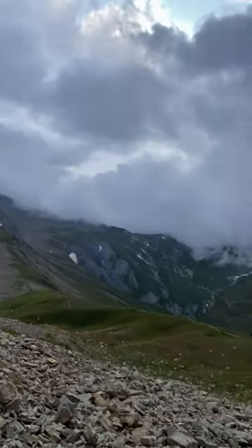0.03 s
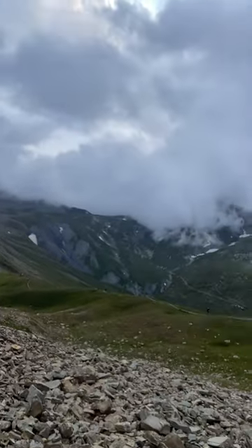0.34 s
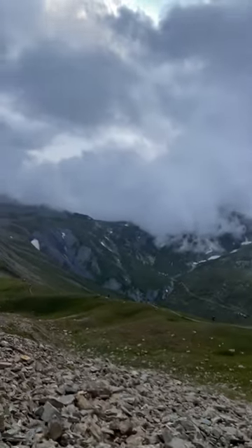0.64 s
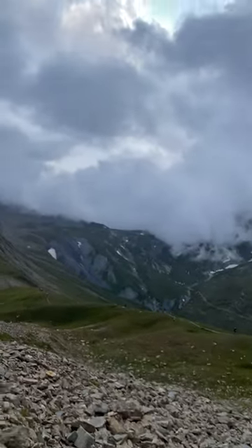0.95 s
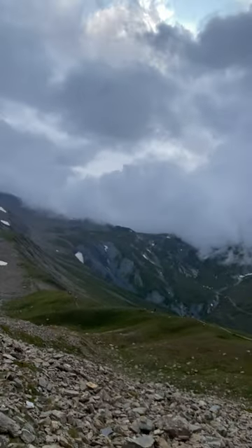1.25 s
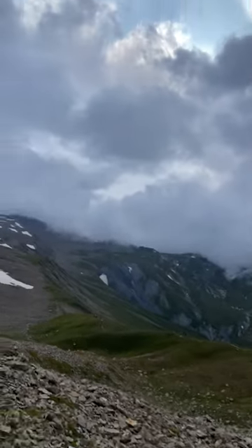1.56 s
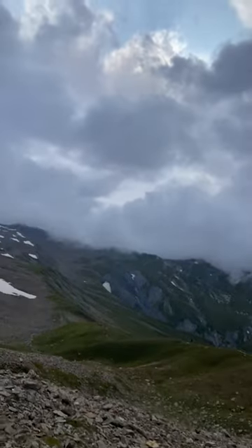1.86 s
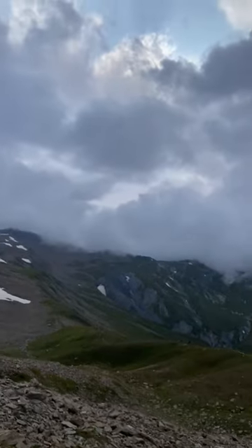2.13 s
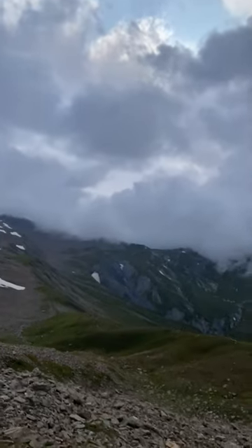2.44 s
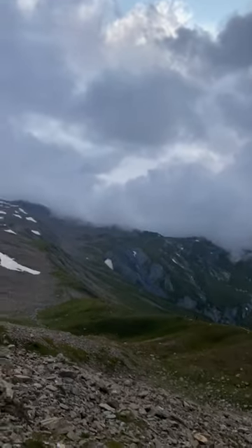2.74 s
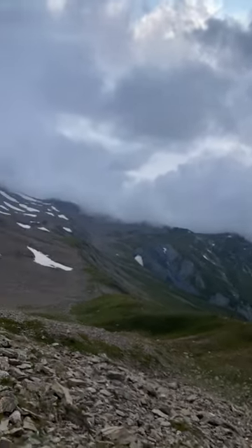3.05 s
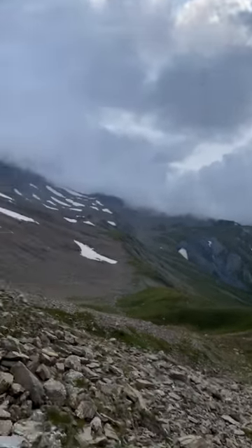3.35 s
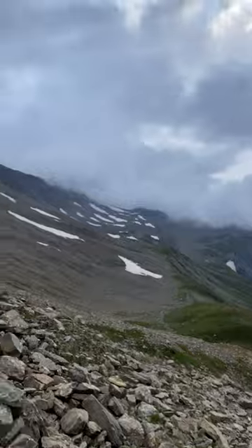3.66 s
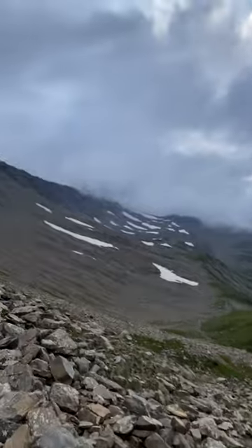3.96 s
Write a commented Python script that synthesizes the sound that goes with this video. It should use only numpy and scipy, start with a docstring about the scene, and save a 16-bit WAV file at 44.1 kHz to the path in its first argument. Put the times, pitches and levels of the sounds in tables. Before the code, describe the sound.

Close footsteps grind gravel and knock stones together on an open slope, with small gear ticks and brief jacket swishes. A gust buffets the microphone, then dies down as the steps go on with sharper clacks and dull thuds.

```python
"""A walker's boots crunch over loose stones on a windy mountainside, camera in hand.
Each press grinds the gravel or tips a flat stone with a clack, and heavy steps jolt the camera.
Close by, a jacket swishes as its cloth rubs, and small hard pieces of gear tick together.
Behind it all, a gust rumbles on the microphone, whistles thinly over an edge and dies down."""
import sys
import numpy as np
from scipy import signal
from scipy.fft import rfft, irfft, next_fast_len
from scipy.io import wavfile
from scipy.ndimage import map_coordinates

SR = 44100
rng = np.random.default_rng(int(sys.argv[2]) if len(sys.argv) > 2 else 0)


def transcribe(signal):
    """Save signal, clipped to [-1, 1], as a 16-bit WAV file at the path in sys.argv[1]."""
    frames = np.atleast_2d(signal).T
    limited = np.clip(frames, -1, 1)
    pcm = np.round(limited * 32767).astype(np.int16)
    wavfile.write(sys.argv[1], SR, pcm)


N = 4 * SR

# how the wind's upper rumble and its rush swell and fade: time_s, relative_level_db
SWIRL_LEVELS = [(0, -42), (.1, -30.5), (.3, -40), (.42, -30), (.65, -23.5), (.82, -36.5), (1.1, -33.5),
                (1.35, -37.5), (1.7, -36.5), (2.3, -44.5), (4, -52)]
RUSH_LEVELS = [(0.0, -43.5), (0.19, -52.5), (0.4, -43.5), (0.57, -41), (0.92, -43.5), (1.14, -37),
               (1.3, -42.5), (1.63, -40), (1.79, -45), (2.36, -47.5), (2.56, -47.5), (4.0, -51.5)]
# the tone of coarse gravel and of a small hard click: frequency_hz, gain_db
GRAVEL_SPECTRUM = [(150, -22), (400, 0), (800, -4.5), (1300, -2), (2000, 0), (2400, -4.5), (2850, -10.5),
                   (4000, -21), (5500, -37), (12000, -67.5)]
CLICK_SPECTRUM = [(800, -31), (2000, -12.5), (2700, 4), (3800, -4), (5000, -5.5), (6800, 0), (8300, -1.5),
                  (9500, -11.5), (11000, -7), (13000, -15.5), (15000, -29.5)]
SIDES = np.array([[1], [-1]])  # plus for the left channel, minus for the right


def amp(db):
    """Turn decibels into a number to multiply by."""
    return 10 ** (np.asarray(db) / 20)


def unit(x):
    """Scale a sound to an average (rms) level of 1."""
    return x / np.sqrt(np.mean(x ** 2) + 1e-20)


def along(points, hz):
    """Read between (frequency_hz, value) points on a log frequency scale."""
    point_hz, values = np.transpose(points)
    return np.interp(np.log(hz + 1), np.log(point_hz + 1), values)


def curves(rows):
    """One value per sample for each column after the time."""
    times, *columns = np.transpose(rows)
    return [np.interp(np.arange(N) / SR, times, column) for column in columns]


def wobble(per_s):
    """A smooth random curve through per_s new values a second."""
    return map_coordinates(rng.standard_normal(N // 10), [np.arange(N) * per_s / SR], mode="wrap")


def scatter(shape):
    """Bell-curve random numbers, held between -2 and 2."""
    return np.clip(rng.standard_normal(shape), -2, 2)


def filtered(x, response):
    """Multiply each frequency in x by response(hz)."""
    size = next_fast_len(N + SR // 2)
    return irfft(rfft(x, size) * response(np.fft.rfftfreq(size, 1 / SR)), size)[..., :N]


def coloured(x, spectrum, size=2048):
    """Give x a spectrum, with a filter that rings only after each hit."""
    cepstrum = irfft(np.log(amp(along(spectrum, np.fft.rfftfreq(size, 1 / SR)))))
    cepstrum[1:size // 2] *= 2  # move the ringing from before the hit to after it
    cepstrum[size // 2 + 1:] = 0
    return signal.fftconvolve(x, irfft(np.exp(rfft(cepstrum))))[:N]


def noise(spectrum):
    """Steady noise with the given spectrum."""
    return unit(filtered(rng.standard_normal(N), lambda hz: amp(along(spectrum, hz))))


def grains(spectrum, per_s, spread_db, hiss):
    """Tiny hits of random size over a smooth hiss."""
    hits = (rng.random(N) < per_s / SR) * np.sign(rng.standard_normal(N))
    hits *= amp(spread_db * scatter(N))
    return unit(coloured(unit(hits) + hiss * rng.standard_normal(N), spectrum))


def strokes(rows, rise_s=0.003, fall_s=0.007):
    """A loudness curve: each (start_s, length_s, level_db) row rises, holds and dies away."""
    power, t = np.zeros(N), np.arange(N) / SR
    for start_s, length_s, level_db in rows:
        rise = np.clip((t - start_s) / rise_s + 0.5, 0, 1)
        fall = np.exp(-np.clip((t - start_s - length_s) / fall_s, 0, 20))
        power += (amp(level_db) * rise * fall) ** 2
    return np.sqrt(power)


def add(track, start_s, sound):
    """Mix a sound into the track at start_s."""
    part = track[max(round(start_s * SR), 0):][:len(sound)]
    part += sound[:len(part)]


def nearby(x, left_db, echo_db=-9.5, echo_fade_s=0.013):
    """A close sound reaches both sides of the microphone, with faint echoes off ground and walker."""
    # how far the left side's wave is ahead of the right's: frequency_hz, lead_radians
    left_lead = [(200, 0), (500, -.4), (1050, -.1), (1800, -1.55), (3000, -2.4), (3900, -.9), (4900, -1.8),
                 (5600, -.45), (8500, -.75), (10000, -1.5), (13500, -2.6)]
    direct = filtered(x, lambda hz: np.exp(0.5j * SIDES * along(left_lead, hz)))
    t = np.arange(SR // 10) / SR
    tail = rng.standard_normal((2, len(t))) * t * amp(-60 * t / echo_fade_s)
    tail /= np.linalg.norm(tail, axis=1, keepdims=True)
    echoes = signal.fftconvolve(x[None], tail, axes=1)[:, :N]
    return amp(SIDES * left_db) * (direct + amp(echo_db) * echoes)


def wind_rumble(flutter_db=0.5, stereo_db=-31):
    """Big swirls of air push on both sides of the microphone almost together."""
    # the strength of the push: time_s, level_db
    levels = [(0.0, -23), (0.12, -20), (0.14, -28.5), (0.31, -23), (0.33, -29.5), (0.39, -20.5),
              (0.87, -22), (0.99, -24.5), (1.06, -14), (1.12, -21.5), (2.02, -30), (2.06, -22),
              (2.18, -33.5), (2.65, -29.5), (3.15, -35), (3.8, -33), (3.92, -40.5), (4.0, -34)]
    # its deep tone: frequency_hz, gain_db
    spectrum = [(20, -29.5), (32, -10.5), (45, -8.5), (65, -1.5), (110, -5.5), (160, -14.5), (220, -24),
                (320, -47.5), (1500, -100)]
    level_db, = curves(levels)
    pair = noise(spectrum) + SIDES * amp(stereo_db) * noise(spectrum)
    return amp(level_db) * unit(pair * amp(flutter_db * wobble(8.5)))


def wind_swirl(gain_db=-2, flutter_db=2, stereo_db=-17):
    """Middle-sized swirls thicken the rumble while the gust lasts."""
    # a hump in the upper bass: frequency_hz, gain_db
    spectrum = [(80, -37.5), (130, 0), (175, 4), (240, -8), (330, -21), (600, -67), (2000, -120)]
    level_db, = curves(SWIRL_LEVELS)
    pair = noise(spectrum) + SIDES * amp(stereo_db) * noise(spectrum)
    return amp(level_db + gain_db + flutter_db * wobble(24.97)) * pair


def wind_rush(gain_db=3, flutter_db=1.5):
    """Small swirls make a rushing noise, different on each side of the microphone."""
    # the tone of the rush: frequency_hz, gain_db
    spectrum = [(80, -15), (200, 2), (330, 4), (520, 1), (780, -9), (1200, -15), (1800, -21), (2600, -50.5),
                (3800, -36.5), (5200, -49.5), (7000, -53), (11500, -65.5), (13800, -88.5)]
    # how alike left and right are: frequency_hz, likeness (1 the same, -1 or less opposite)
    likeness = [(200, 0.67), (500, 0.37), (900, -0.45), (1600, -0.25), (2800, -1.2), (7000, 0),
                (13000, -0.9)]

    def shares(hz):
        angle = np.arccos(np.clip(along(likeness, hz), -1, 1)) / 2
        return np.array([np.cos(angle), np.sin(angle)])

    level_db, = curves(RUSH_LEVELS)
    middle, side = filtered(np.array([noise(spectrum), noise(spectrum)]), shares)
    return amp(level_db + gain_db + flutter_db * wobble(35)) * (middle + SIDES * side)


def wind_whistle(waver_hz=26, waver_db=2, breathiness=0.3):
    """Air blowing over an edge makes a thin, unsteady tone that climbs with the wind's speed."""
    # the path the whistle's tones follow: time_s, base_pitch_hz, level_db
    path = [(.2, 1395, -100), (.38, 1450, -53.5), (.48, 1392, -59), (.76, 1423, -58), (1.05, 1602, -58),
            (1.28, 1670, -57.5), (1.35, 1547, -58), (1.61, 1700, -56.5), (1.71, 1424, -58),
            (1.97, 1317, -62.5), (2.5, 1274, -100)]
    base_hz, level_db = curves(path)
    phase = 2 * np.pi * np.cumsum(base_hz + waver_hz * wobble(90)) / SR

    def tone(pitch_ratio, steady=0):
        strength = steady + breathiness * (wobble(130) + 1j * wobble(130))
        return np.real(strength * np.exp(1j * pitch_ratio * phase))

    middle = unit(tone(0.98, steady=1)) + amp(-26) * unit(tone(2.2))
    side = tone(0.93)
    return amp(level_db + waver_db * wobble(30)) * unit(middle + SIDES * side)


def wind_whine(pitch_hz=12060, width_hz=170, gain_db=-52.5, flicker_db=3):
    """A very faint high whine rises and falls with the gust."""
    gust_db = (curves(SWIRL_LEVELS)[0] + curves(RUSH_LEVELS)[0]) / 2
    band = filtered(rng.standard_normal(N), lambda hz: np.exp(-((hz - pitch_hz) / width_hz) ** 2))
    return amp(gust_db + gain_db + flicker_db * wobble(15)) * unit(band)


def jacket(uneven_db=2):
    """Stiff cloth slides over itself in short strokes."""
    # each swish: start_s, length_s, level_db
    swishes = [(.692, 0.017, -42.5), (.712, 0.014, -37.5), (.752, 0.0045, -37), (1.136, 0.012, -54.5),
               (2.906, 0.011, -46), (3.864, 0.021, -46.5)]
    # the tone of rubbing cloth: frequency_hz, gain_db
    spectrum = [(500, -1.5), (1500, 3.5), (2100, 3.5), (2900, 1), (4200, 0), (5400, -3.5), (7000, 0.5),
                (8400, -11), (9600, -22.5), (13000, -26), (15000, -45.5)]
    loudness = strokes(swishes, rise_s=0.00093, fall_s=0.0086) * amp(uneven_db * wobble(250))
    return loudness * grains(spectrum, per_s=4500, spread_db=9.5, hiss=0.97)


def gear_ticks(gain_db=11, tail_db=-41, fade_s=0.0074, rattle_db=-19.5, vary_db=3):
    """Small hard parts tap and rattle with almost no ring; harder taps tend to be brighter."""
    # each tap: start_s, relative_level_db
    taps = [(0.0287, -22), (.078, -31.5), (.1758, -33.5), (0.1851, -22), (.262, -39.5), (.42, -36),
            (.617, -21.5), (1.093, -38.5), (1.252, -42), (1.887, -39.5), (2.323, -32), (2.429, -33.5),
            (2.816, -35.5), (2.909, -43.5), (2.969, -32.5), (3.042, -41.5), (3.105, -37), (3.317, -32),
            (3.4854, -31.5), (3.908, -34)]
    out, t = np.zeros(N), np.arange(SR // 20) / SR
    usual_db = np.mean(taps, axis=0)[1]
    for start_s, level_db in taps:
        tap = amp(tail_db - 60 * t / fade_s) * rng.standard_normal(len(t))
        tap[0] = 1  # the hit itself
        cutoff_hz = 4320 * amp(level_db - usual_db + rng.normal(0, vary_db))
        softness = np.exp(-2 * np.pi * cutoff_hz / SR)
        tap = amp(level_db + gain_db) * signal.lfilter([1 - softness], [1, -softness], tap)
        add(out, start_s, tap)
        for offset_s in rng.uniform(-0.0092, 0.009, 3):  # light touches around the tap
            add(out, start_s + offset_s, amp(rattle_db + rng.normal(0, vary_db)) * tap)
    return coloured(out, CLICK_SPECTRUM)


def pebbles(per_s=19, gain_db=-53.5, spread_db=2.5):
    """Loose bits of stone click here and there."""
    hits = (rng.random(N) < per_s / SR) * amp(gain_db + spread_db * scatter(N))
    return coloured(hits, CLICK_SPECTRUM)


def boot_thuds(pitch_hz=60.4, rise_s=0.0087):
    """The walker's weight lands and jolts the camera."""
    # each landing: start_s, level_db
    landings = [(0.1, -19), (3.597, -19.5), (3.722, -20.5)]
    out, t = np.zeros(N), np.arange(SR // 8) / SR
    swell = (t / rise_s) ** 2 * np.exp(2 * (1 - t / rise_s))
    for start_s, level_db in landings:
        add(out, start_s, amp(level_db) * swell * np.sin(2 * np.pi * pitch_hz * t))
    return out


def gravel_clinks(per_s=220, middle_hz=1672, pitch_spread=0.29, ring_cycles=1.8, spread_db=5):
    """Small stones clink, each for a few cycles at its own pitch."""
    starts = np.flatnonzero(rng.random(N) < per_s / SR)
    out, t = np.zeros(N), np.arange(400) / SR
    for start, (pitch, strength) in zip(starts, scatter((N, 2))[starts]):
        cycles = middle_hz * np.exp(pitch_spread * pitch) * t
        ring = np.sin(2 * np.pi * cycles) * np.exp(-cycles / ring_cycles)
        add(out, start / SR, amp(spread_db * strength) * ring)
    return unit(coloured(out, GRAVEL_SPECTRUM))


def gravel_crunch(coarse_rest_db=-64.5, grit_rest_db=-78.5, coarse_uneven_db=2, grit_uneven_db=3):
    """Each press of a boot grinds coarse stones and fine grit."""
    # each press: start_s, length_s, coarse_level_db, grit_level_db
    presses = [(0.023, 0.033, -52, -62.5), (0.063, 0.053, -54, -60), (0.133, 0.0087, -69, -58),
               (0.159, 0.026, -54, -63), (0.198, 0.13, -65, -77.5), (0.549, 0.092, -59, -70),
               (0.667, 0.018, -45.5, -65), (1.039, 0.054, -60, -67.5), (1.131, 0.039, -52, -66),
               (1.315, 0.11, -73.5, -72), (1.574, 0.034, -59, -64.5), (1.622, 0.085, -50, -66.5),
               (2.164, 0.027, -50, -67), (2.198, 0.083, -55, -65.5), (2.548, 0.06, -54, -84),
               (2.634, 0.11, -55, -71), (2.682, 0.043, -50.5, -72), (2.736, 0.033, -48.5, -77),
               (2.954, 0.097, -63, -65), (3.095, .06, -52.5, -64.5), (3.157, 0.13, -50, -69.5),
               (3.246, 0.026, -40, -68), (3.286, 0.28, -66.5, -81), (3.543, 0.032, -58, -81),
               (3.66, 0.06, -53.5, -83), (3.725, 0.078, -51.5, -72), (3.816, 0.047, -47, -73)]
    # the bright tone of grit: frequency_hz, gain_db
    grit_spectrum = [(1500, -27.5), (2800, 9.5), (3800, 2.5), (5200, -2), (7000, 5.5), (8400, -5),
                     (9500, -10), (12000, -23.5), (15000, -45)]
    rows = np.array(presses)
    restless_db = wobble(7.4)  # the stones never quite rest between presses
    coarse_level = np.hypot(strokes(rows[:, [0, 1, 2]]), amp(coarse_rest_db + restless_db))
    grit_level = np.hypot(strokes(rows[:, [0, 1, 3]]), amp(grit_rest_db + restless_db))
    grinding = grains(GRAVEL_SPECTRUM, per_s=600, spread_db=3.5, hiss=0.63)
    coarse = unit(grinding + amp(0.5) * gravel_clinks())
    grit = grains(grit_spectrum, per_s=1200, spread_db=6.5, hiss=0.76)
    coarse_level *= amp(coarse_uneven_db * wobble(90))
    grit_level *= amp(grit_uneven_db * wobble(60))
    return coarse_level * coarse + grit_level * grit


def stone_clacks(rise_s=0.0001, fade_s=0.0064, settle_db=-5.5, settle_fade_s=0.021):
    """A tipped stone gives a dead clack, and the gravel settles round it."""
    # stones knocking together: start_s, relative_level_db, pitch_hz
    knocks = [(0.03, -33, 2300), (0.078, -32, 1790), (0.082, -23.5, 1860), (0.096, -31, 2270),
              (.277, -31, 1600), (0.406, -29, 1860), (.713, -23, 1730), (.726, -28, 1610),
              (1.648, -29, 1960), (1.696, -19.5, 2880), (2.167, -31.5, 1450), (2.585, -38, 1750),
              (2.694, -24, 1370), (2.765, -26, 1270), (2.772, -29, 1470), (3.1286, -20, 526),
              (3.135, -14.5, 1670), (3.1364, -11.5, 1140), (3.244, -25.5, 1740), (3.2515, -19, 1660),
              (3.256, -18, 2560), (3.63, -26.5, 1870), (3.687, -31.5, 1950), (3.8264, -35, 1720),
              (3.9249, -20, 540), (3.9262, -27, 1130), (3.96, -35.5, 1340)]
    # the dull tone of stone: frequency_hz, gain_db
    spectrum = [(100, 1), (350, 0), (2000, -4), (2800, -14.5), (5000, -35), (9000, -33.5), (14000, -70)]
    out, t = np.zeros(N), np.arange(SR // 10) / SR
    low_note = amp(-12) * np.sin(2 * np.pi * 482 * t)  # the stone on its bed
    for start_s, level_db, pitch_hz in knocks:
        ring = np.sin(2 * np.pi * pitch_hz * t) + low_note
        clack = ring * amp(-60 * t / fade_s) * (1 - np.exp(-t / rise_s))
        settle = amp(settle_db - 60 * t / settle_fade_s) * rng.standard_normal(len(t))
        add(out, start_s, amp(level_db) * (clack / np.abs(clack).max() + settle))
    return coloured(out, spectrum)


def scene():
    """Wind over the walker's boots and clothes, in stereo."""
    wind = wind_rumble() + wind_swirl() + wind_rush() + wind_whistle() + wind_whine()
    walker = gravel_crunch() + pebbles() + jacket() + gear_ticks()
    return wind + boot_thuds() + nearby(walker, left_db=0.35) + nearby(stone_clacks(), left_db=0.1)


def record(dry):
    """The camera keeps nothing above 14800 Hz."""
    return filtered(dry, lambda hz: hz < 14800)


dry = scene()
out = record(dry)
transcribe(out)
```